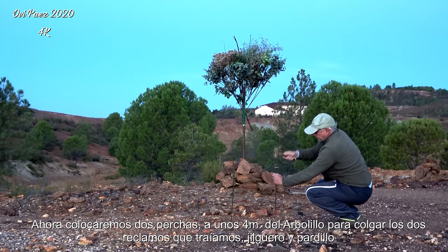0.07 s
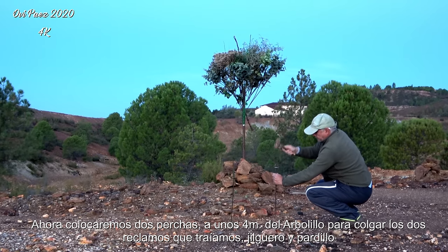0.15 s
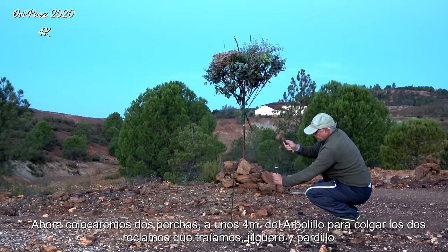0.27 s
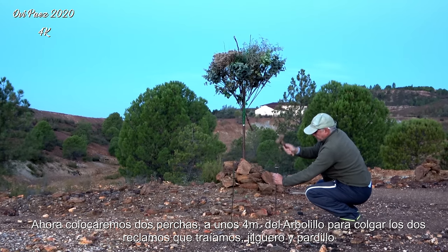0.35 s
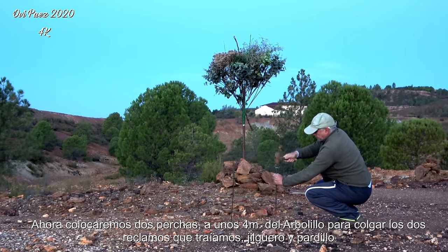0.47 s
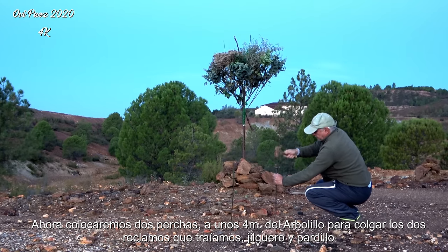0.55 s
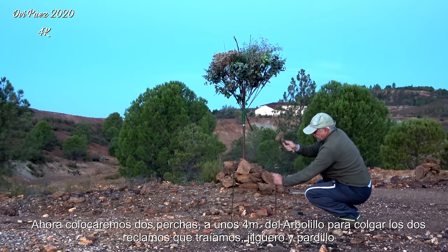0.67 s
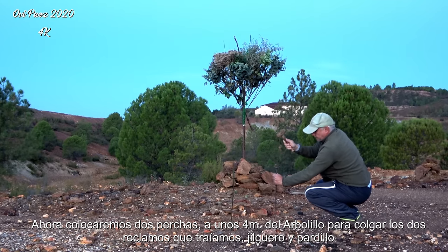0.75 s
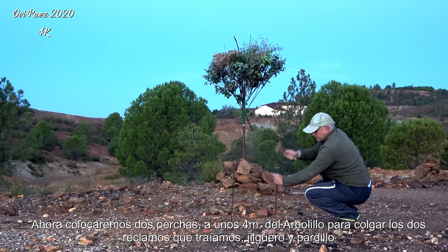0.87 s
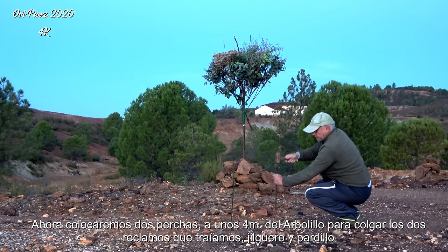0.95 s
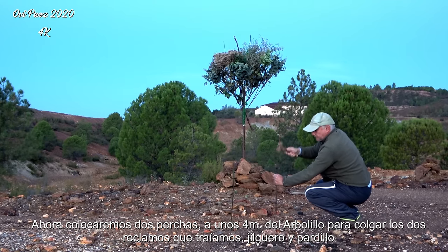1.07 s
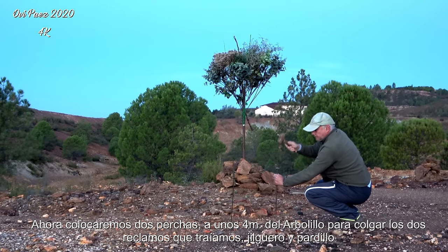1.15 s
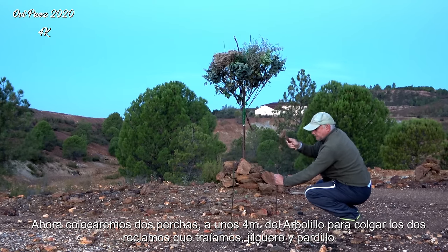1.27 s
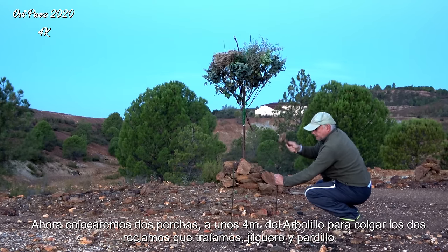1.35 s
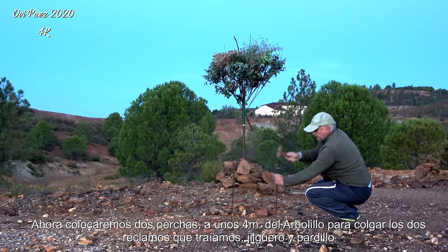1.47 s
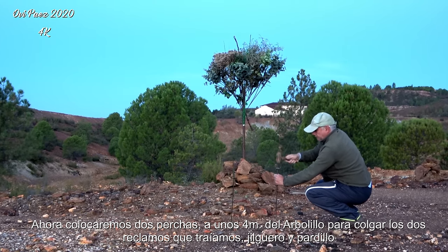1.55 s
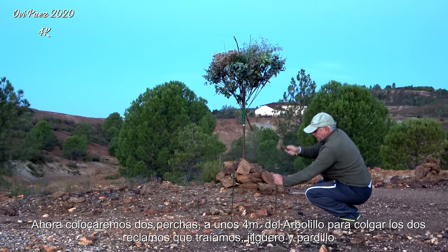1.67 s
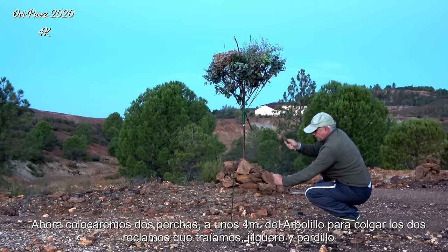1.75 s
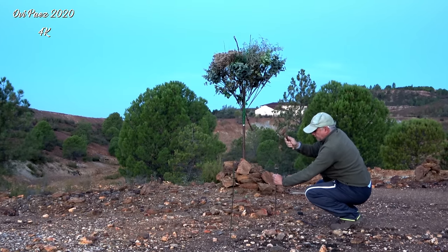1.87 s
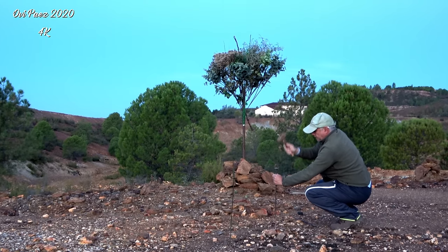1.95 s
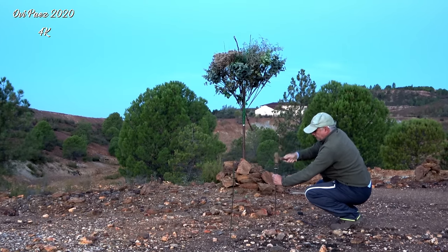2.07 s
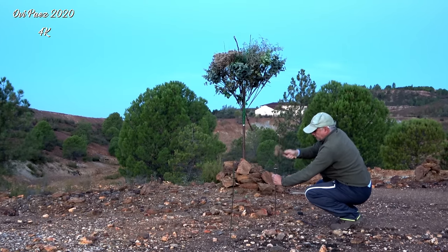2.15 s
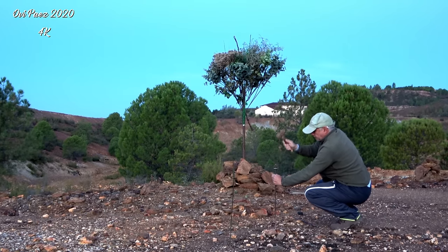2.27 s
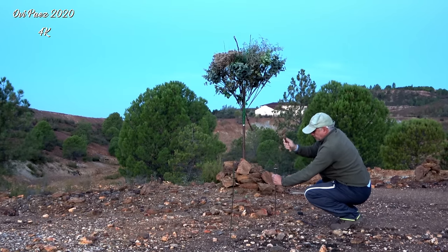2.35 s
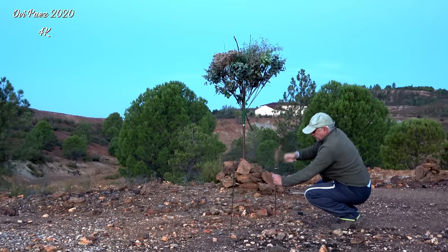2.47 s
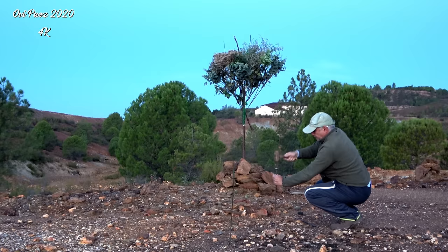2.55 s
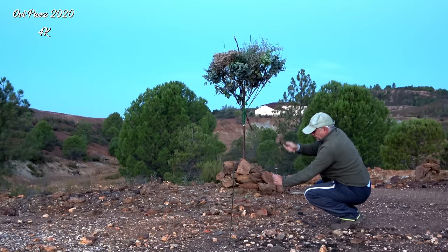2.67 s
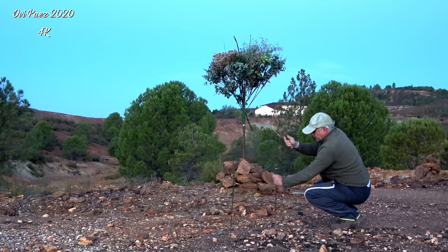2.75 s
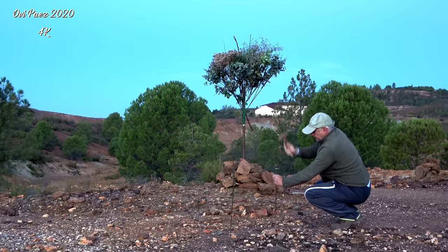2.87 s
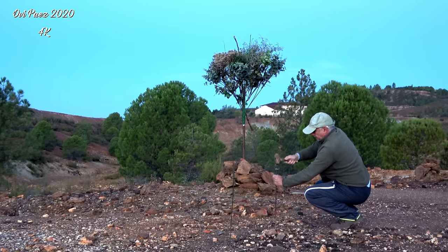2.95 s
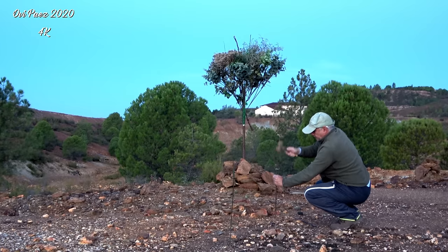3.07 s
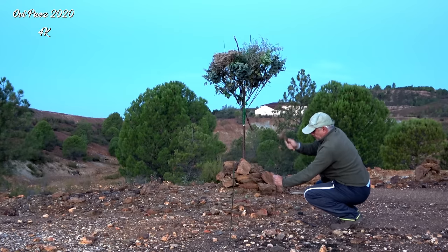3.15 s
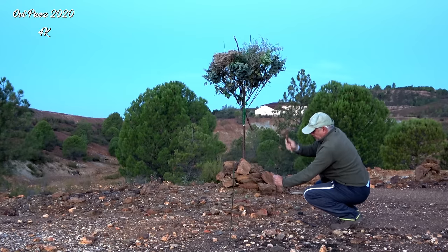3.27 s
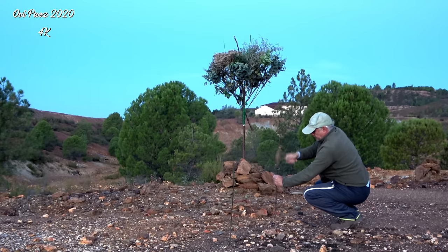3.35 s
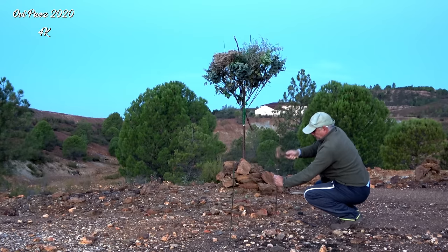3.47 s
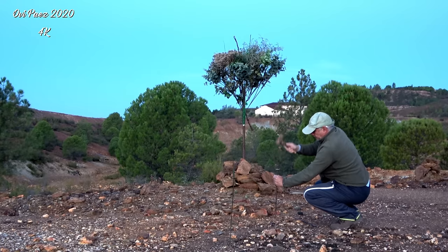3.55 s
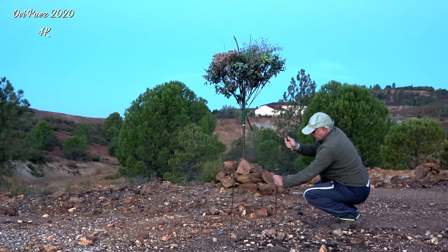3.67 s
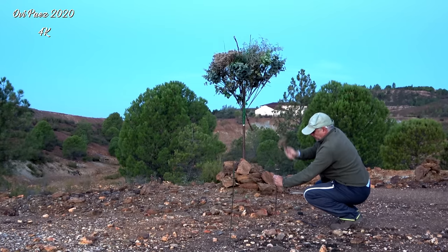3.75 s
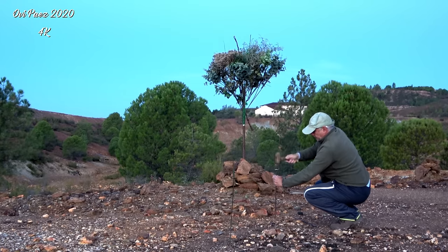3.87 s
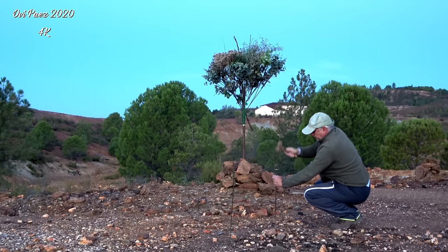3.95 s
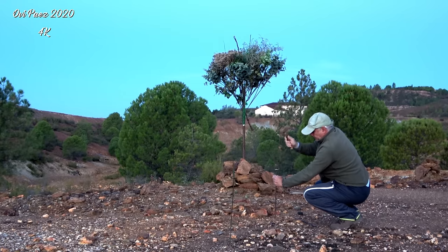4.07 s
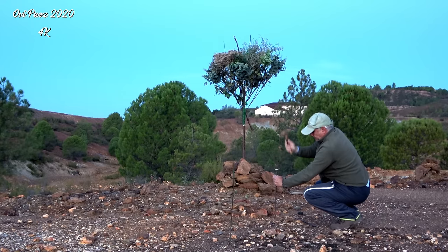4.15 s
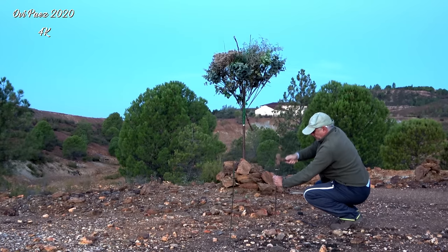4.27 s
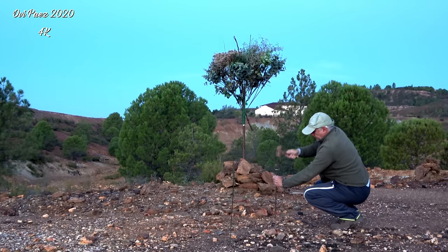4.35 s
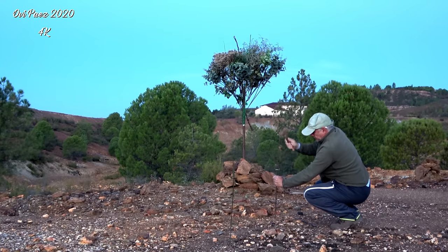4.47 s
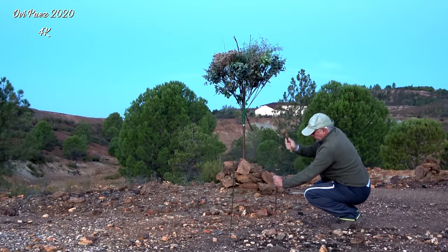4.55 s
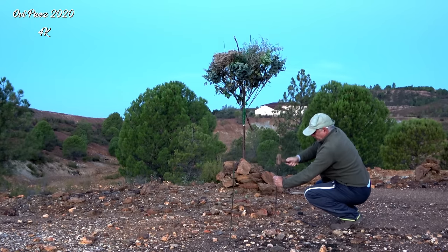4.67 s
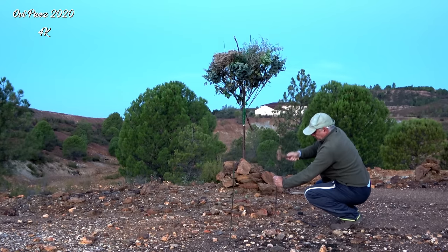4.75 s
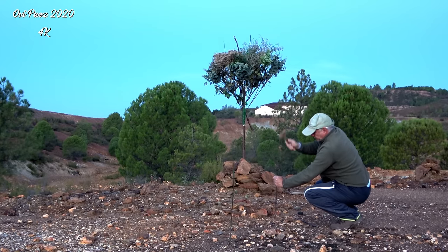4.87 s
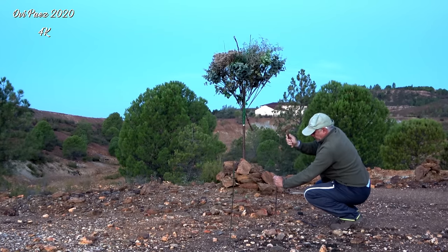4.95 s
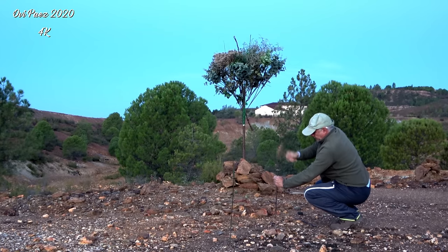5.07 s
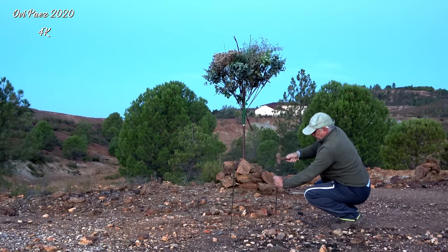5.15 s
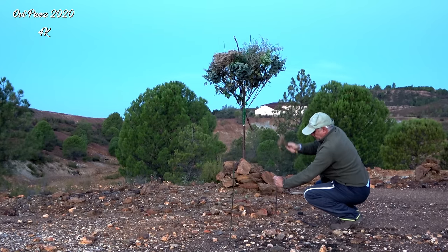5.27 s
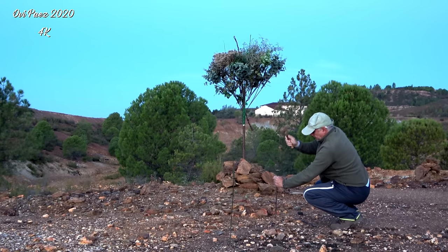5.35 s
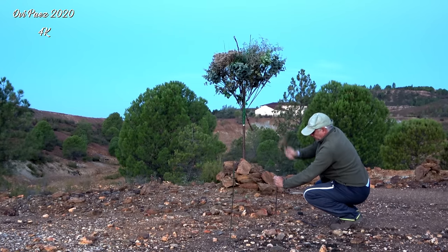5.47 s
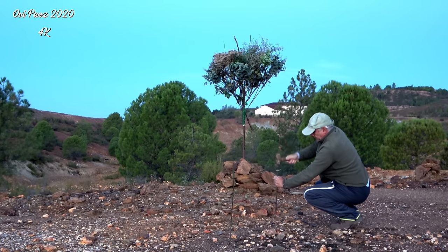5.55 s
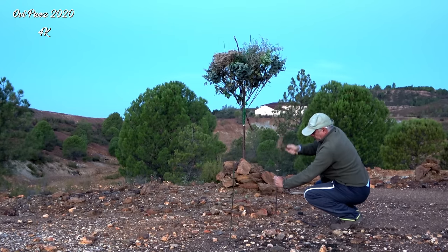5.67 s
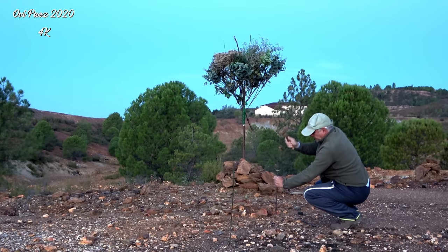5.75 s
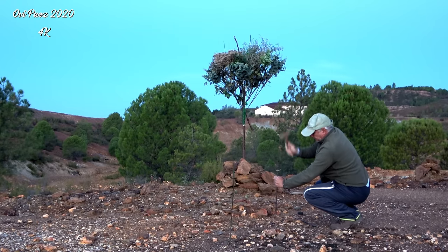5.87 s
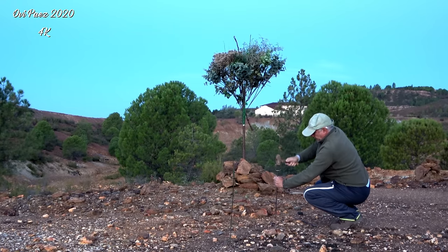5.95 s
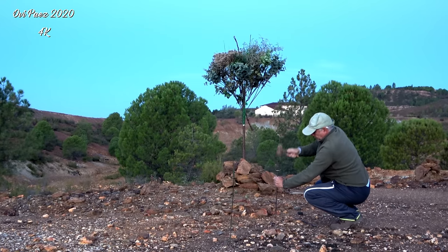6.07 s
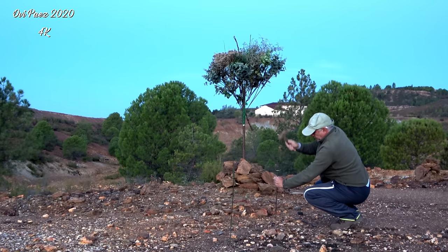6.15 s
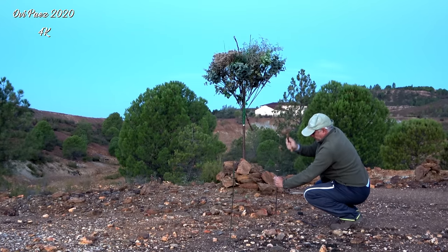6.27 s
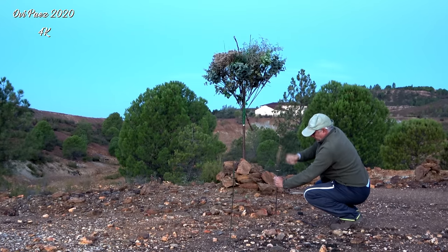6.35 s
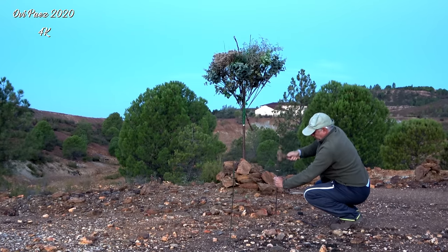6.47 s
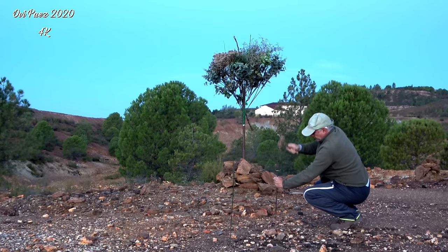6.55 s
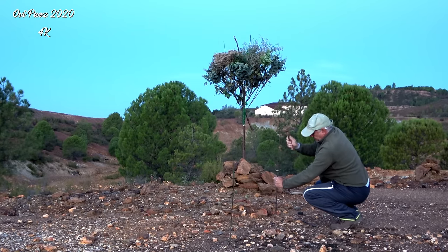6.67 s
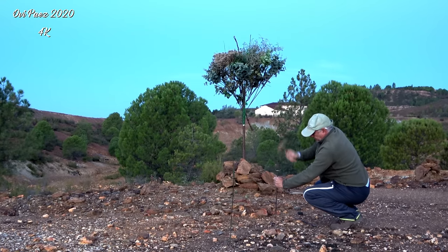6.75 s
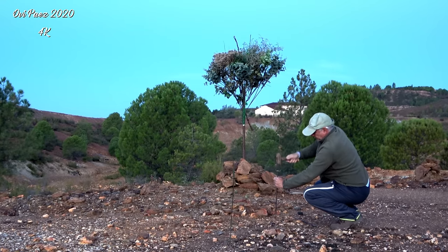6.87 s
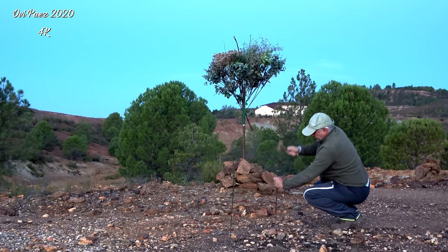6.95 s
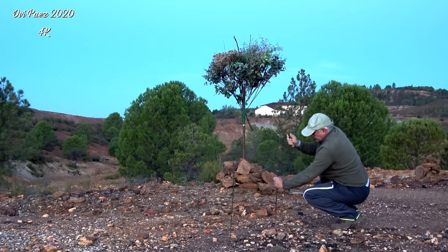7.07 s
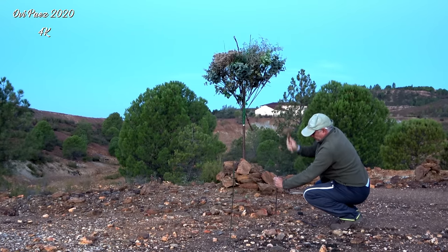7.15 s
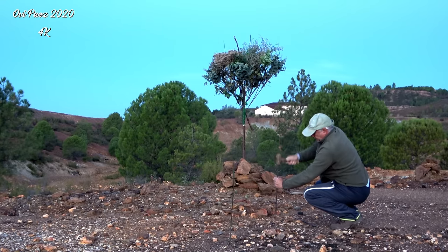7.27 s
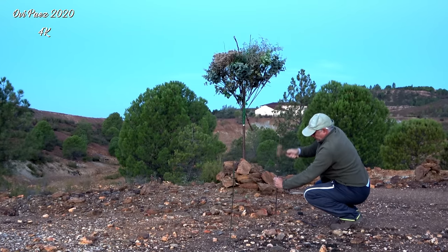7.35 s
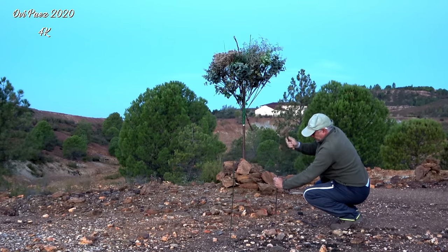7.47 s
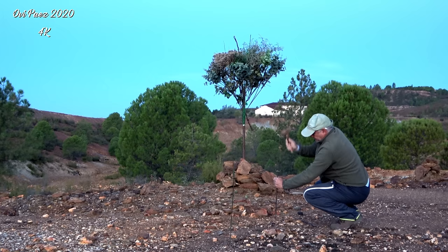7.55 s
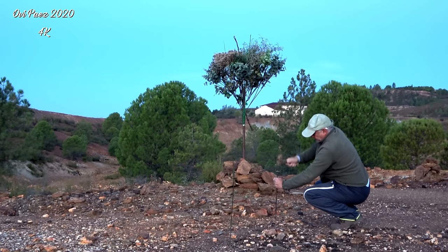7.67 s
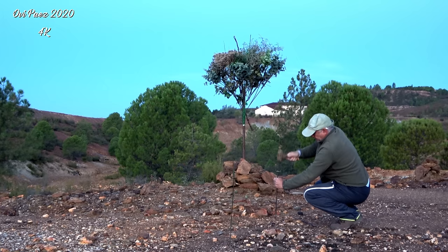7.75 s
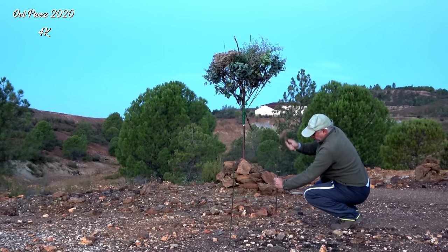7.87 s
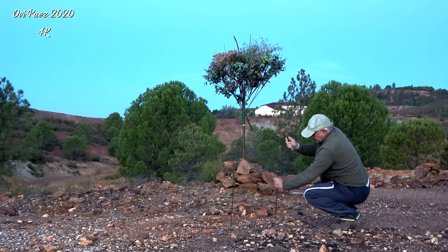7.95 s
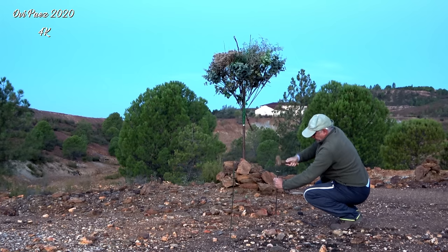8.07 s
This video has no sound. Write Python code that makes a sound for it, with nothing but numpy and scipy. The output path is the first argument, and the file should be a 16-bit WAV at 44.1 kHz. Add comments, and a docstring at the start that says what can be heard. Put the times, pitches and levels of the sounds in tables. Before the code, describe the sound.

Eighteen hard steel-on-steel hits, a few metres from the microphone in open scrubland. Each is a dry, noisy clack with a brief metallic tick and a short scatter of reflections off stones. Early blows are loose and thin; later ones are firmer, a little louder, with a low earthy knock and a faint ringing tone. Distant birds chirp sparsely over light wind, far rumble and soft hiss.

```python
"""In open scrubland, a thin steel stake is hammered into stony ground a few metres from a stereo microphone.
Each blow is a short noisy contact force: it cracks, excites the damped modes of stake and soil, and is
followed by a long tone from the hammer head. Rocks and bushes return echoes as decaying noise.
Small birds, gliding sines, chirp far off over noise bands: distant rumble, light wind and microphone hiss."""
import sys
import numpy as np
from scipy import signal
from scipy.fft import next_fast_len
from scipy.io import wavfile

SR = 44100
rng = np.random.default_rng(int(sys.argv[2]) if len(sys.argv) > 2 else 0)


def output_pcm(signal):
    """Save a mono or channel-first signal as 16-bit PCM at the path in sys.argv[1].

    Samples are clipped to [-1, 1] before scaling.
    """
    pcm = np.clip(np.atleast_2d(signal).T, -1, 1) * 32767
    wavfile.write(sys.argv[1], SR, np.round(pcm).astype(np.int16))


N = 357210

# Hammer blows: start_s, level_db, stake_depth (0-1), treble_tilt_db_per_octave,
# head_ring_db (relative to level_db), lift_off_s (after the start)
BLOWS = [(0.0, -12.5, 0, -0.9, -59, 0.039), (0.483, -10.5, 0.07, -0.4, -48, 0.027),
         (0.958, -9.5, 0.05, -0.5, -64, 0.039), (1.559, -13, 0.14, -2, -39, 0.033),
         (2.074, -8.5, 0, -0.6, -50.5, 0.04), (2.527, -9, 0.25, 0.9, -47.5, 0.021),
         (2.976, -7.5, 0.28, -0.3, -44.5, 0.039), (3.406, -9, 0.49, -0.4, -36.5, 0.046),
         (3.84, -6, 0.4, -2.5, -45, 0.054), (4.275, -7, 0.56, -0.3, -37, 0.028),
         (4.693, -8, 0.78, 0.2, -35, 0.036), (5.138, -8, 0.67, -0.5, -37, 0.02),
         (5.555, -5.5, 0.69, -0.7, -42.5, 0.026), (5.977, -7.5, 0.84, -1.5, -35, 0.027),
         (6.41, -9, 0.91, 1, -34, 0.025), (6.827, -7.5, 0.82, -1, -38.5, 0.025),
         (7.275, -8.5, 0.92, -0.4, -38, 0.017), (7.684, -6, 0.86, -1.7, -46, 0.039)]
# Stake modes: pitch_hz, shallow_db, deep_db (relative levels), t60_s
STAKE_MODES = [(1170, -18, 1.5, 0.0054), (1572, -15, -5.5, 0.032), (1833, -2.5, -5.5, 0.0085),
               (1988, -6, -9, 0.012), (2350, -10.5, -2, 0.01), (2780, -11.5, -25.5, 0.0073),
               (3088, -11, -14, 0.042), (3683, -15.5, -8, 0.027), (4306, -16.5, -9, 0.01),
               (4567, -10, -11, 0.026), (5000, -5.5, -6, 0.0089), (5290, -13, -8.5, .02),
               (5600, -7.5, -12.5, 0.018), (6130, -14.5, -11, 0.013), (6000, -13, -6.5, 0.01),
               (6360, -13.5, 9, 0.0091), (6743, -12, -3, 0.018), (7150, -10, -1, 0.01),
               (7445, -2.5, -8.5, 0.0094), (8430, -11, -18.5, 0.011), (8960, 0.5, -12, 0.0073),
               (9370, 2.5, -14, 0.0073), (9760, 3.5, -14, 0.012), (10450, -18.5, 3, 0.011),
               (12900, -8, -23, 0.018), (13200, -19.5, -20, 0.013)]
# Ground modes of the thud: pitch_hz, shallow_db, deep_db (relative levels), t60_s
SOIL_MODES = [(176, -8.5, -13.5, 0.14), (234, -7.5, -5.5, 0.11), (316, -14, -6.5, 0.053),
              (363.2, -11, 5.5, 0.052), (400, -14, -2, 0.03), (462, -7, -1, 0.038), (550, 12.5, -8, 0.0094)]
# Reflections from rocks and bushes: delay_s, level_db (before the treble emphasis), left_minus_right_db, smear_s
ECHOES = [(0.018, -14.5, -2, 0.002), (0.023, -21, 1.5, 0.005), (0.03, -18.5, -1.9, 0.0028),
          (0.042, -32, 0.5, 0.0048), (.065, -40, 4, 0.0027), (0.091, -45, 4, 0.0077),
          (0.1264, -42.5, -1, 0.0047), (.143, -54, 8, .002), (.157, -45, 2, 0.0027),
          (0.167, -42.5, 2, 0.0038), (0.18, -44, 4, 0.0036), (0.196, -45, 1, 0.015), (.212, -50.5, -1, .01),
          (0.231, -50, 3, .006)]
# Background spectrum: frequency_hz, density_db (relative, per Hz)
LAND_SPECTRUM = [(15, -29), (25, -6), (118, -7.5), (192, -7.5), (273, -13), (600, -11.5), (651, -22.5),
                 (809, -16), (952, -13), (1120, -18.5), (1220, -13.5), (1470, -17.5), (1930, -22),
                 (14800, -25.5), (16500, -45)]
# Background stereo correlation: frequency_hz, likeness (0-1)
LIKENESS = [(60, 0.94), (180, 0.63), (550, 0.43), (1650, 0.18), (4970, 0.38), (15000, 0.21)]
# Far motor bands: centre_hz, width_hz, level_db (about which the level drifts)
DRONE = [(189.4, 24, -81.5), (856, 190, -70), (1360, 300, -76)]
# Wind on the microphone ports: time_s, level_db (about which the level drifts)
WIND = [(0.0, -73), (1.01, -79.5), (1.76, -72), (2.19, -83), (2.71, -63.5), (3.18, -69), (3.29, -68.5),
        (5.3, -83.5), (7.22, -79), (8.1, -88)]
# Bird calls: start_s, length_s, first_hz, middle_hz, last_hz, level_db
BIRD_CALLS = [(0.158, 0.033, 2300, 2700, 3200, -75), (0.183, 0.051, 3720, 4420, 4400, -68.5),
              (0.262, 0.043, 3900, 6180, 3800, -59), (0.349, 0.048, 4200, 5890, 3900, -59.5),
              (2.618, .025, 3280, 3050, 2750, -64), (2.64, 0.1, 2770, 2960, 3600, -71),
              (3.268, 0.035, 5500, 5280, 3870, -63.5), (3.792, 0.019, 4970, 5960, 7500, -63),
              (3.797, 0.036, 2500, 3500, 4750, -62), (5.066, 0.036, 3380, 2950, 2500, -70),
              (5.492, 0.0144, 5600, 6200, 6900, -68), (5.756, 0.022, 5500, 5190, 4330, -62),
              (5.824, 0.072, 4740, 5220, 3680, -64), (6.37, 0.054, 2730, 4180, 4500, -60),
              (7.618, 0.039, 3000, 2980, 2304, -61), (8.008, 0.013, 5200, 4800, 4400, -62.5)]

LAND_DB = -62.5   # rms of the background without the motor bands
CUTOFF_HZ = 16900   # upper edge of the recorder
MODES_DB, BITE_S = -9, 0.00059   # stake modes relative to the blow; steel bites this long after the touch
# The thud, relative to the blow, grows until the stake sits firm at FIRM_DEPTH
THUD_LOOSE_DB, THUD_FIRM_DB, FIRM_DEPTH = -30.5, -22.5, 0.32
# The head rings shorter as the stake gives less
HEAD_HZ, HEAD_T60_SHALLOW_S, HEAD_T60_DEEP_S = 1506, 0.99, 0.36


def from_db(db):
    """Decibel law: the amplitude gain of a level in dB."""
    return 10 ** (np.asarray(db) / 20)


def rms_one(x):
    """Normalisation of power: scaled to rms 1."""
    return x / np.sqrt(np.mean(x ** 2) + 1e-20)


def at_hz(points, hz):
    """Linear interpolation of a two-column table over log frequency."""
    table = np.array(points)
    return np.interp(np.log(hz), np.log(table[:, 0]), table[:, 1])


def band(x, low_hz, high_hz):
    """Band limitation by a Butterworth band-pass."""
    edges_hz = [low_hz, min(high_hz, .45 * SR)]
    return signal.sosfilt(signal.butter(2, edges_hz, "band", fs=SR, output="sos"), x)


def high_pass(x, order, hz):
    """Removal of bass by a Butterworth high-pass."""
    return signal.sosfilt(signal.butter(order, hz, "high", fs=SR, output="sos"), x)


def drift(rate_hz):
    """Low-pass filtered noise: a slow random fluctuation of rms 1."""
    step = 40   # samples between the slow values
    r = np.exp(-2 * np.pi * step * rate_hz / SR)
    noise = rng.standard_normal(N // step + 2002)
    slow = signal.lfilter([1], [1, -2 * r, r * r], noise)[2000:]   # start-up dropped
    return np.interp(np.arange(N) / step, np.arange(len(slow)), rms_one(slow))


def ring(force, hz, t60):
    """Damped resonance: a unit click excites a decaying sine of initial height 1."""
    r, w = from_db(-60 / (t60 * SR)), 2 * np.pi * hz / SR
    return signal.lfilter([0, np.sin(w)], [1, -2 * r * np.cos(w), r * r], force + 1e-18)


def add(out, sound, s):
    """Superposition: mixes a sound into out from time s on."""
    at = max(round(s * SR), 0)
    end = min(at + sound.shape[-1], N)
    out[..., at:end] += sound[..., :end - at]


def stake(crack_db=10, spread_db=2, rise_s=0.0004, contact_s=0.0021, rattle_db=-18, rattle_s=0.015, detune=0.014):
    """Modal excitation: one rough contact force, with a rattling tail, is heard as a crack and rings every mode."""
    out, t = np.zeros(N), np.arange(SR // 6) / SR
    onset = 1 - np.exp(-(t / rise_s) ** 2)
    shape = onset * (np.exp(-t / contact_s) + from_db(rattle_db) * np.exp(-t / rattle_s))
    grit = rng.standard_normal((len(BLOWS), len(t)))
    chance = rng.standard_normal((len(BLOWS), len(STAKE_MODES), 2))   # grip and seat change strength and pitch
    for (s, blow_db, depth, tilt_db, *_), noise, luck in zip(BLOWS, grit, chance):
        force = noise * np.abs(noise) ** 0.67 * shape   # uneven grains of contact
        force /= np.sqrt(np.sum(force ** 2))
        sound = from_db(crack_db - tilt_db) * band(force, 1200, 3300)
        sound += from_db(crack_db + tilt_db) * band(force, 2700, 8900)
        for (hz, shallow_db, deep_db, t60), (own, shift) in zip(STAKE_MODES, luck):
            mode_db = (1 - depth) * shallow_db + depth * deep_db
            mode_db += tilt_db * np.log2(hz / 4000) + spread_db * own
            sound += from_db(mode_db + MODES_DB) * ring(force, hz * (1 + detune * shift), t60)
        add(out, from_db(blow_db) * sound, s + BITE_S)
    return high_pass(out, 2, 800)   # a thin rod radiates little bass


def soil(lead_s=.007, lead_db=-12, spread_db=2.0, settle_db=-37, settle_s=0.036):
    """Ground resonance: a push and settling gravel ring the soil; a weaker push comes early through faster rock."""
    out, t = np.zeros(N), np.arange(SR // 4) / SR
    gravel = rng.standard_normal((len(BLOWS), len(t)))
    chance = rng.standard_normal((len(BLOWS), len(SOIL_MODES)))
    for (s, blow_db, depth, *_), noise, luck in zip(BLOWS, gravel, chance):
        push = from_db(settle_db) * noise * np.exp(-t / settle_s)
        push[[0, round(lead_s * SR)]] = from_db(lead_db), 1   # early push, main push
        thud = np.zeros(len(t))
        for (hz, shallow_db, deep_db, t60), own in zip(SOIL_MODES, luck):
            mode_db = (1 - depth) * shallow_db + depth * deep_db + spread_db * own
            thud += from_db(mode_db) * ring(push, hz, t60)
        firmness = min(depth / FIRM_DEPTH, 1)
        thud_db = THUD_LOOSE_DB + (THUD_FIRM_DB - THUD_LOOSE_DB) * firmness
        add(out, from_db(blow_db + thud_db) * thud, s + BITE_S - lead_s)
    return high_pass(out, 4, 125)


def hammer_head(rise_s=0.011):
    """Free vibration: one clean mode swells when the head lifts off the stake, then decays exponentially."""
    out, t = np.zeros(N), np.arange(SR // 2) / SR
    for s, blow_db, depth, _, ring_db, lift_s in BLOWS:
        t60 = (1 - depth) * HEAD_T60_SHALLOW_S + depth * HEAD_T60_DEEP_S
        envelope = from_db(-60 * t / t60) * (1 - np.exp(-t / rise_s))
        tone = np.sin(2 * np.pi * HEAD_HZ * t) * envelope
        add(out, from_db(blow_db + ring_db) * tone, s + lift_s)
    return out


def ground_dip(x, hz=720, width=180, keep_db=-10):
    """Destructive interference: the ground reflection weakens one band of the direct sound."""
    r, w = np.exp(-np.pi * width / SR), 2 * np.pi * hz / SR
    half = (1 - r * r) / 2
    dipped = signal.lfilter([half, 0, -half], [1, -2 * r * np.cos(w), r * r], x)
    return x - (1 - from_db(keep_db)) * dipped


def quarter_turn(x):
    """Hilbert transform: every frequency is shifted by a quarter cycle."""
    return signal.hilbert(x, next_fast_len(N)).imag[:N]


def echoes(x, scatter_db=-48, scatter_t60=0.08, haze_db=-72, haze_t60=.5, side_db=-16, widen_db=5, bass_db=-9):
    """Diffuse reflection: convolution with smeared echoes, near scatter off the stones and a long faint haze."""
    t = np.arange(SR // 2) / SR
    mid, side = rng.standard_normal((2, len(t)))
    power = np.zeros((2, len(t)))
    for delay, db, pan_db, smear in ECHOES:
        since = np.maximum(t - delay, 0)
        burst = (t >= delay) * np.exp(-2 * since / smear) / (smear * SR / 2)    # energy 1
        power += from_db(2 * db + np.array([[pan_db], [-pan_db]])) * burst
    since = np.maximum(t - .017, 0)
    scatter = from_db(2 * scatter_db - 120 * since / scatter_t60)
    haze = from_db(2 * haze_db - 120 * since / haze_t60)
    power += (since > 0) * (scatter + haze)
    side_gain = from_db(side_db + widen_db * np.minimum(t / .1, 1))   # later echoes are wider
    answer = np.sqrt(power) * (mid + side_gain * side * [[1], [-1]])
    answer = band(answer, 1500, 8200) + from_db(bass_db) * answer     # small stones and leaves favour treble
    return signal.fftconvolve(x[None], answer, axes=1)[:, :N]


def birds(steep=0.69, warble=0.018, fade=.3, echoes_s_db=((.006, -5), (.012, -11))):
    """Frequency modulation: sines glide on an arc, fastest at first, with a warble and close central echoes."""
    out = np.zeros((2, N))
    wobble = rms_one(band(rng.standard_normal(N), 80, 250))
    pans = rng.normal(0, 1.6, len(BIRD_CALLS))   # dB, up on the left and down on the right
    for (s, length, *arc_hz, db), pan_db in zip(BIRD_CALLS, pans):
        along = np.linspace(0, 1, round(length * SR))
        parabola = np.polyfit([0, .5, 1], arc_hz, 2)
        pitch_hz = np.polyval(parabola, along ** steep)
        pitch_hz *= 1 + warble * wobble[round(s * SR):][:len(along)]
        phase = 2 * np.pi * np.cumsum(pitch_hz) / SR
        note = from_db(db) * signal.windows.tukey(len(along), fade) * np.sin(phase)
        add(out, note * from_db([[pan_db], [-pan_db]]), s)
        for lag, echo_db in echoes_s_db:
            add(out, from_db(echo_db) * note, s + lag)
    return out


def wind(lumpy_db=4, side_db=-12):
    """Amplitude modulation: lumpy low noise follows the gusts."""
    s, db = np.transpose(WIND)
    mid, side = band(rng.standard_normal((2, N)), 22, 63)
    gust = from_db(np.interp(np.arange(N) / SR, s, db) + lumpy_db * drift(18))
    return gust * rms_one(mid + from_db(side_db) * side * [[1], [-1]])


def land(patchy_db=3.5):
    """Partially correlated noise bands: far rumble below, microphone hiss above, and a few droning bands."""
    out = np.zeros((2, N))
    edges_hz = 25 * 2 ** np.arange(0, 9.5, .4)
    white = rng.standard_normal((2, 2, N))   # neighbouring bands take different noise
    for k, (low, high) in enumerate(zip(edges_hz, edges_hz[1:])):
        mid, side = band(white[k % 2], low, high)
        hz = np.sqrt(low * high)
        alike = at_hz(LIKENESS, hz)
        patches = patchy_db * drift(8.7) * (hz < 2000)   # the hiss stays steady
        gain = from_db(at_hz(LAND_SPECTRUM, hz) + patches)
        out += gain * (np.sqrt(1 + alike) * mid + np.sqrt(1 - alike) * side * [[1], [-1]])
    out = from_db(LAND_DB) * rms_one(out)
    for hz, width, db in DRONE:
        gain = from_db(db + 3.0 * drift(3.2))
        out += gain * rms_one(band(rng.standard_normal(N), hz - width / 2, hz + width / 2))
    return out


def scene():
    """Superposition of the blows, their echoes, the birds, the wind and the land."""
    steel, thud = ground_dip(stake()), ground_dip(soil())
    near = steel + thud + hammer_head()
    # the two ports hear the blow a fraction of a cycle apart
    low_pass = signal.butter(2, 10000, fs=SR, output="sos")
    soft_steel = signal.sosfiltfilt(low_pass, steel)
    spread = quarter_turn(from_db(-15.5) * soft_steel + from_db(-13.5) * thud)
    direct = near * from_db([[.12], [-.12]]) + spread * [[1], [-1]]
    reflected = echoes(steel + from_db(-3.5) * thud)
    return direct + reflected + birds() + wind() + land()


def record(dry, top=0.72):
    """Saturation and band limitation: peaks are rounded below top, then the highest treble is cut."""
    rounded = top * np.tanh(dry / top)
    return signal.sosfilt(signal.cheby2(12, 70, CUTOFF_HZ, fs=SR, output="sos"), rounded)


dry = scene()
out = record(dry)
output_pcm(out)
```